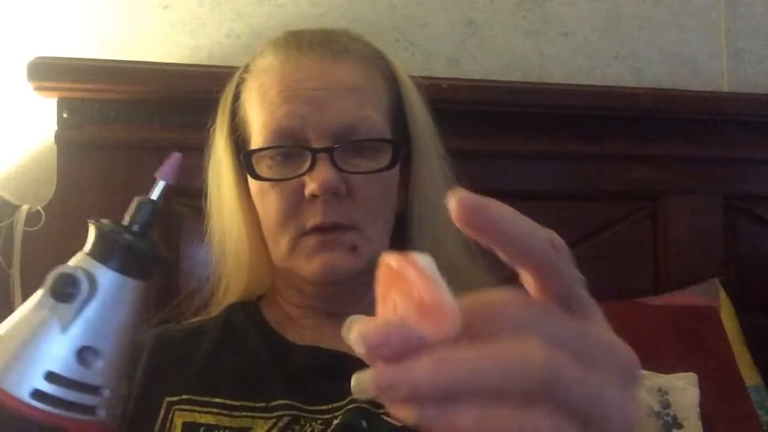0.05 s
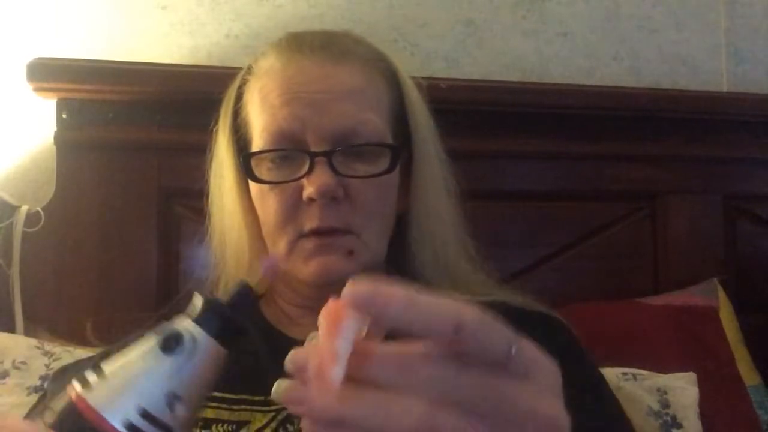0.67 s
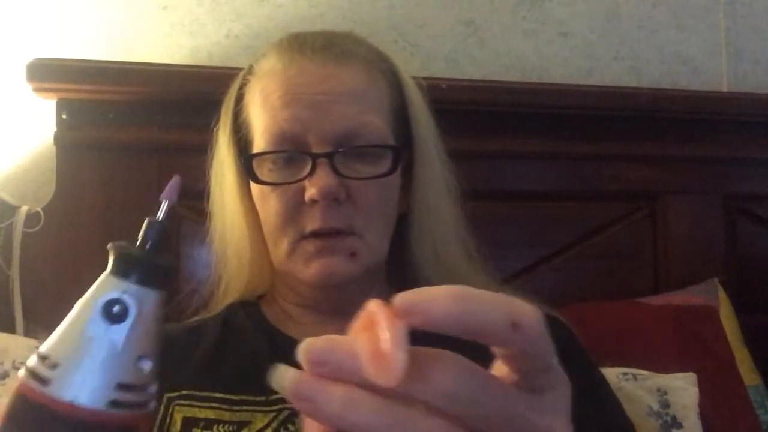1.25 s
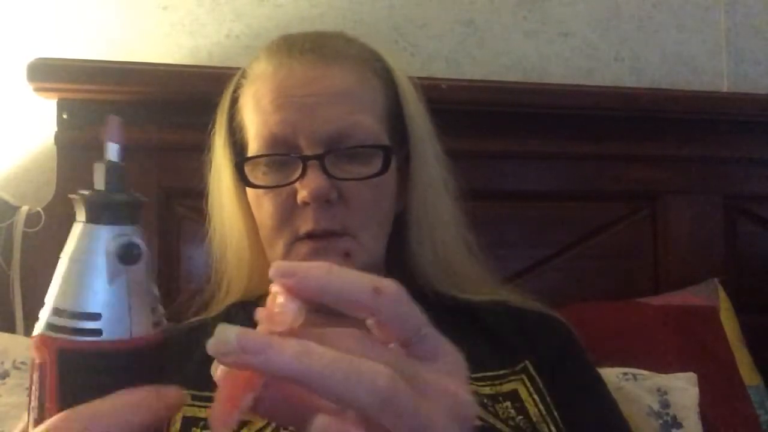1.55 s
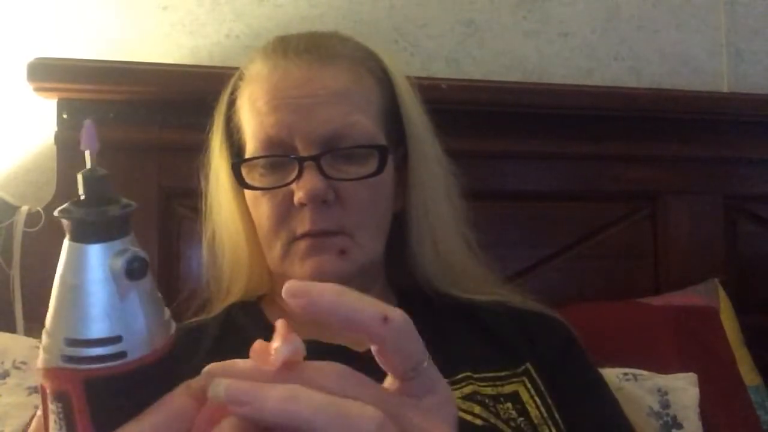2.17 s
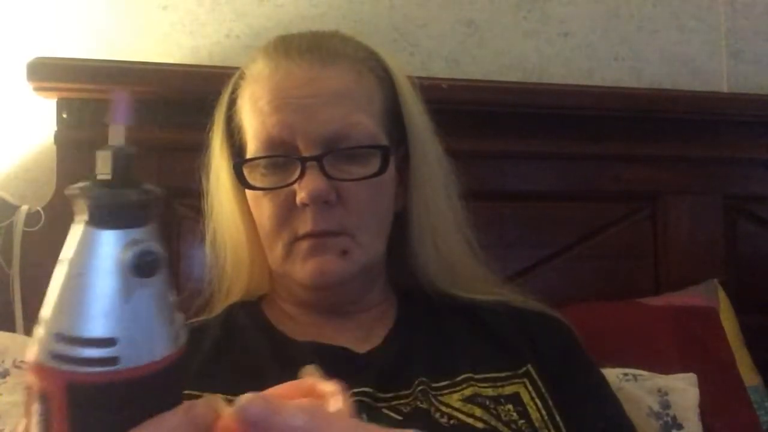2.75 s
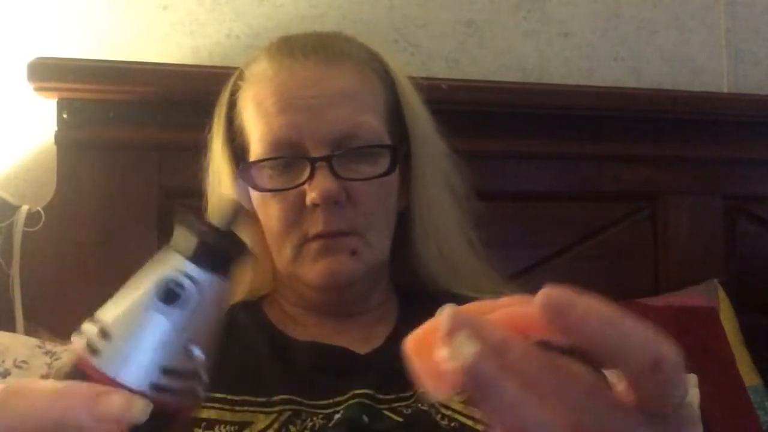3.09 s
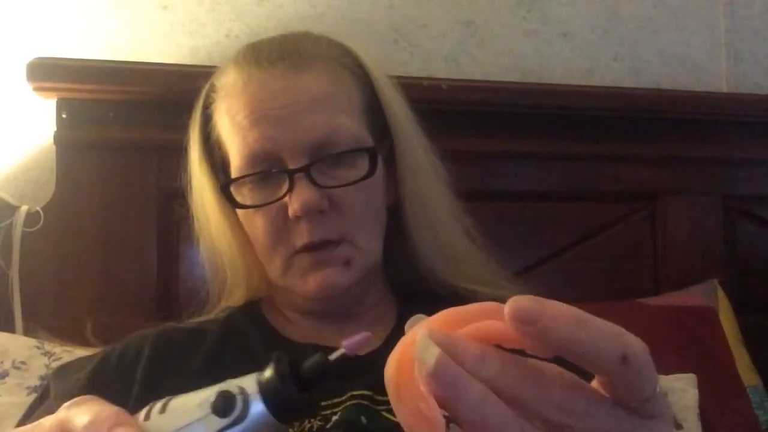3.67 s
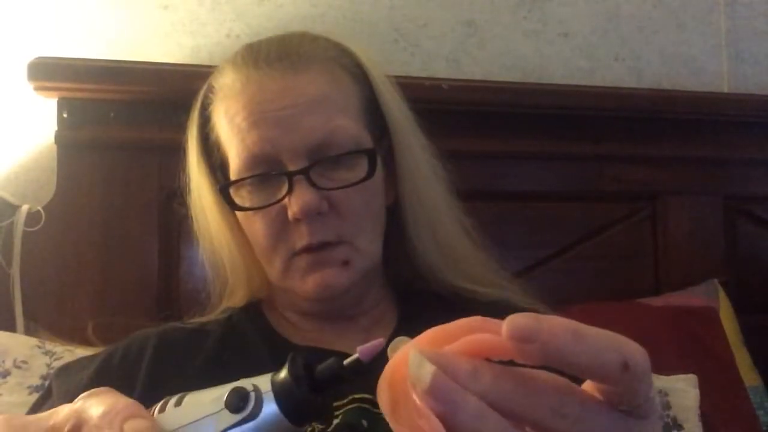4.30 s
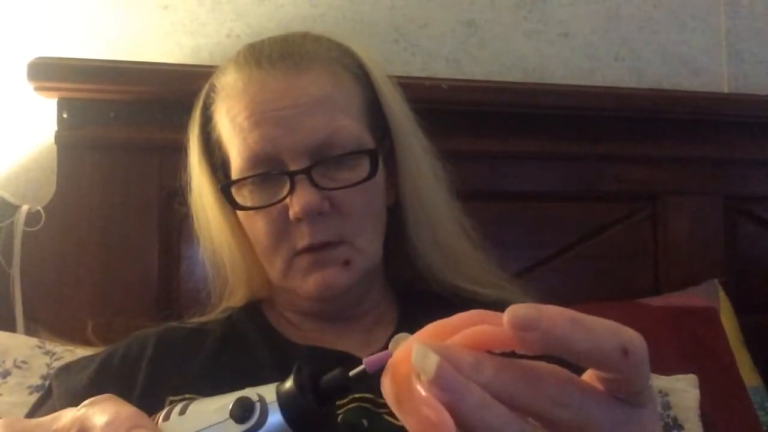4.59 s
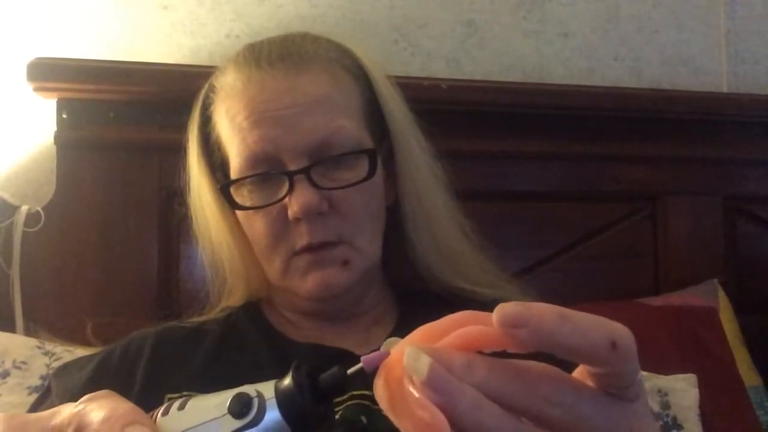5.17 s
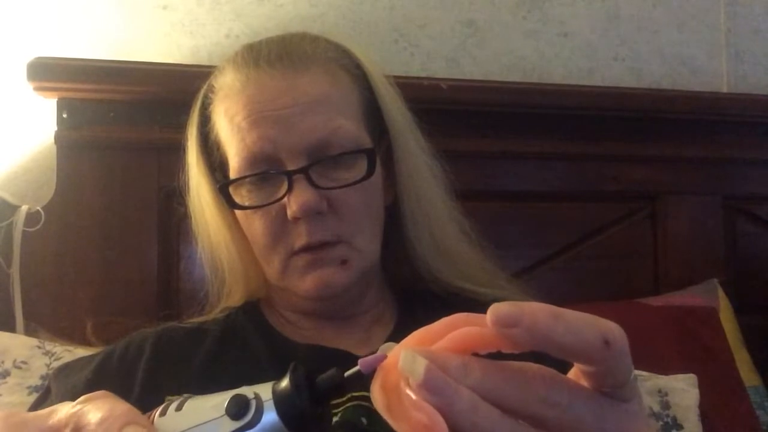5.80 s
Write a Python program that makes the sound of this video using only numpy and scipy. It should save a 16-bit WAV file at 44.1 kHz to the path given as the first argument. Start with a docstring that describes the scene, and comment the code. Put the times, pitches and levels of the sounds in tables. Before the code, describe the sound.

A handheld rotary tool is already running at low speed, close to the microphone in a bedroom, and keeps going for the whole six seconds or so. It makes a buzzing electric whine with a fine, fast rattle and a hiss of cooling air, its pitch creeping slowly upward. A thin, high squeal fades within the first second. The tone shifts as the tool is moved, noticeably around 1.4 seconds, when a faint, low puff of vent air brushes the microphone, and again at about 3.2 seconds as it is lowered. At about 4.5 and 4.8 seconds the grinding stone briefly touches a piece of plastic with short, gritty rasps. From 5 seconds to the end it bites again and again in quick, uneven scrapes with a fizzy, chipping edge, louder and rougher, over the continuing motor whine.

```python
"""A bedroom, close up and in mono: a handheld rotary tool runs at low speed, slowly winding up.
Its shaft rattles once a turn, chopped mains current makes the motor buzz, and the fan whines and hisses.
The colour shifts as the tool is tilted, held upright, then lowered to a plastic piece,
where the stone bites harder and harder, rasping, tearing off chips and dragging on the shaft."""
import sys
import numpy as np
from scipy import signal
from scipy.fft import rfft, irfft
from scipy.io import wavfile

SR = 44100
rng = np.random.default_rng(int(sys.argv[2]) if len(sys.argv) > 2 else 0)


def file_out(sig):
    """Save sig as 16-bit WAV at sys.argv[1]."""
    # one column per channel
    cols = np.atleast_2d(sig).T
    # limit, then scale
    lim = np.clip(cols, -1, 1)
    pcm = np.round(lim * 32767).astype(np.int16)
    wavfile.write(sys.argv[1], SR, pcm)


N = 257582
TIME = np.arange(N) / SR
BINS = np.fft.rfftfreq(N, 1 / SR)

# how the tool is held: t/s, pose (up to 0 raised, 1 tilted, 2 upright, from 3 lowered)
POSE_PATH = [(0, -1), (.25, 0.3), (.55, 1), (1.25, 0.45), (1.45, 2), (1.65, 2), (2.95, 2), (3.25, 2.5),
             (5.84, 3.5)]
# rattle partials for each grip: order (multiple of the shaft speed), level/dB
RATTLE_OPEN = [(13, -65), (14, -50.5), (15, -59), (17, -50), (18, -43.5), (19, -57), (20, -58), (21, -38.5),
               (22, -42), (23, -33.5), (24, -35), (25, -38), (26, -35), (27, -56), (28, -69), (29, -64),
               (30, -42), (31, -50), (33, -53), (34, -52)]
RATTLE_SHADED = [(13, -74), (14, -44.5), (15, -54), (17, -46), (18, -54), (19, -58), (20, -57), (21, -46.5),
                 (22, -56), (23, -44.5), (24, -48), (25, -42.5), (26, -53), (27, -46), (28, -66), (29, -68),
                 (30, -51.5), (31, -55), (33, -50), (34, -55)]
RATTLE_LOWERED = [(13, -60), (14, -57), (15, -44.5), (17, -66), (18, -56), (19, -54), (20, -51),
                  (21, -42.5), (22, -39), (23, -34.5), (24, -42), (25, -46), (26, -44.5), (27, -47.5),
                  (28, -54), (29, -46), (30, -42), (31, -43.5), (33, -44), (34, -48.5)]
# reflections lift or cancel single partials: t/s, half length/s, order, gain/dB
FLARES = [(.1, 0.13, 24, -7), (.05, .2, 26, -2), (0.427, 0.11, 23, 1.5), (1.25, 0.11, 8, 5.5),
          (1.85, .25, 8, -3.5), (1.383, 0.085, 14, 7), (1.5, 0.1, 16, 11), (1.507, 0.1, 23, 6.5),
          (1.523, 0.14, 8, -7.5), (1.9, 0.15, 16, -7), (2.423, 0.12, 2, 8.5), (3.15, 0.44, 8, -5),
          (2.55, 0.14, 14, -3), (2.6, 0.13, 18, 11), (2.915, 0.13, 11, 23.5), (3.15, 0.28, 18, 16.5),
          (3.297, 0.22, 16, 3)]
# the motor's lowest tones: order, level/dB
HUM = [(1, -58), (2, -59.5), (6, -52), (7, -52.5), (9, -63.5), (10, -60), (11, -68)]
# slot and commutator sidebands, rising a chop rate a row: tilted level/dB, upright/dB, lowered/dB
SLOT_SIDEBANDS = [(-60, -52.5, -54), (-47, -41, -46), (-56, -58, -50.5), (-61, -53, -60), (-74, -63, -53.5),
                  (-62, -57, -54), (-81, -58, -51.5), (-58, -53.5, -50.5)]
BAR_SIDEBANDS = [(-58.5, -61, -61), (-53.5, -54, -66), (-47.5, -45, -48.5), (-44, -42, -42),
                 (-39, -48.5, -44.5), (-43, -62, -60), (-52, -59, -59), (-50, -61, -66), (-51, -63, -58)]
# fader ride on the commutator buzz: t/s, gain/dB
BUZZ_RIDE = [(0.05, -8), (0.45, 0.5), (.8, 0), (1.15, 1), (1.5, 1), (1.75, -1.5), (2.3, -3), (2.7, 1),
             (3.15, 5), (3.7, -0.5), (4.95, -2)]
# passing motor whistles: start/s, end/s, order, level/dB
WHISTLES = [(-0.6, .56, 11.36, -44.5), (-0.6, 0.582, 11.41, -48.5), (.56, .9, 11.36, -55),
            (.58, 0.905, 11.41, -50), (2, 3.4, 10.8, -56), (2.504, 4.403, 1.765, -55),
            (4.3, 6, 1.61, -58.5)]
# the stone bears on the plastic: start/s, end/s, rasp drive/dB, growl level/dB
BITES = [(4.539, 4.548, -26, -35), (4.57, 4.598, -32, -44), (4.789, 4.833, -33, -39.5),
         (4.992, 5.035, -32, -37), (5.048, 5.069, -29, -39), (5.115, 5.172, -33, -39),
         (5.187, 5.232, -31, -39), (5.255, 5.301, -28.5, -35), (5.326, 5.362, -28.5, -35.5),
         (5.364, 5.4, -35, -44), (5.424, 5.47, -30.5, -49), (5.476, 5.52, -30.5, -35),
         (5.531, 5.574, -29.5, -35.5), (5.59, 5.629, -27, -38.5), (5.636, 5.668, -34, -38),
         (5.74, 5.755, -28.5, -50), (5.78, 5.814, -25.5, -36.5), (5.816, 5.852, -27.5, -37)]
# the grit tears off chips: start/s, end/s, level/dB
CHIPS = [(4.537, 4.557, -35), (4.557, 4.595, -36.5), (4.79, 4.86, -45), (5.116, 5.14, -41),
         (5.195, 5.245, -38), (5.26, 5.31, -38), (5.326, 5.345, -34), (5.35, 5.365, -43),
         (5.445, 5.47, -39), (5.49, 5.538, -41), (5.55, 5.59, -35), (5.595, 5.62, -44), (5.63, 5.648, -38),
         (5.728, 5.746, -35), (5.763, 5.808, -40)]
# resonances of the shell, the stone on its shank and the plastic: f/Hz, width/Hz, gain/dB
SHELL_MODES = [(767.5, 18, 8.5), (1343, 157, 5), (2312, 440, -1), (2809, 510, 2.5)]
STONE_MODES = [(4258, 130, -8), (4760, 460, -5), (5386, 270, 4), (5820, 270, 4.5), (6504, 276, 8),
               (7640, 790, -10), (9300, 760, -16), (11000, 1200, -14), (12800, 1200, -29)]
PLASTIC_MODES = [(534, 170, -9.5), (1583, 200, 3.5), (1850, 320, 3.5), (2159, 325, 5.5), (2400, 84, -3),
                 (3316, 300, 1.5)]
# fan partials for each grip: order, level/dB
WHINE_RAISED = [(35, -64), (37, -52), (38, -58), (40, -43), (42, -44.5), (44, -55), (46, -48), (47, -51),
                (50, -52), (52, -61), (54, -57), (57, -61), (60, -70), (63, -57)]
WHINE_TILTED = [(35, -57), (37, -52.5), (38, -60), (39, -54), (41, -56), (42, -58), (44, -60), (45, -56),
                (46, -56), (47, -63), (48, -54), (49, -58), (50, -58), (51, -66), (53, -56), (54, -59),
                (56, -59), (59, -61), (63, -64)]
WHINE_SHADED = [(35, -55), (36, -65), (37, -54), (38, -60), (40, -57), (41, -68), (43, -60.5), (45, -54),
                (46, -58), (47, -55), (48, -52), (49, -63), (50, -58), (51, -67), (53, -62), (58, -63),
                (63, -66)]
WHINE_LOWERED = [(35, -66), (36, -59), (37, -47.5), (38, -63), (39, -52), (41, -57), (42, -63), (44, -53),
                 (45, -65), (46, -50.5), (48, -49), (50, -58), (51, -68), (53, -68), (55, -54.5), (58, -59),
                 (60, -66), (63, -70)]
# noise colours of tearing chips, cooling air and the vent jet: f/Hz, relative level/dB
FIZZ_EQ = [(3000, -25), (6000, 2.5), (8500, -8), (9600, -6), (10400, -3), (11400, -1), (12200, -13),
           (13200, -12), (14500, -20), (16000, -26)]
AIR_EQ = [(15, -57), (50, -27), (120, -18), (230, -15), (360, -9.5), (650, -6), (820, -1.5), (1050, -8),
          (1400, 1), (1750, -4), (2700, -5.5), (3400, -7), (5000, -2.5), (6300, -7.5), (7300, -8),
          (9500, -13.5), (11500, -15), (13000, -16), (16000, -26)]
JET_EQ = [(2000, -45), (3700, -36), (4500, -6.5), (5700, -6.5), (6600, -3.5), (7150, 0), (7900, -2.5),
          (8400, -21), (16000, -62)]
# the draught's rumble: f/Hz, relative level/dB
DRAUGHT_EQ = [(10, -37), (28, -19), (50, -3), (85, 1), (160, -7), (260, -18), (700, -55)]
# the draught brushes the microphone: t/s, half length/s, level/dB
PUFFS = [(1.34, 0.035, -56), (1.427, .02, -54), (1.49, 0.028, -42.5), (1.58, 0.043, -49.5),
         (1.71, 0.045, -61)]
# how strongly each part faces the microphone: raised/dB, tilted/dB, upright/dB, lowered/dB
RATTLE_DB = (-3.5, -1.5, -1.5, 0)
THIRD_DB, BAR_OCTAVE_DB = (-46, -51, -60.5, -50.5), (-49, -35.5, -47.5, -49.5)
JET_DB, JET_TOP_DB = (-6.5, -2.5, -7, -1.5), (3.5, 1, -3, -5)

CHOP_HZ = 120  # slices of mains current a second
BEARING_ORDER, SLOTS, BARS = 2.573, 8, 16  # cycles a turn: bearing, armature, commutator
GRIP_S, GRIP_FADE_S, RELEASE_S, RELEASE_FADE_S = 1.387, 0.039, 3.08, 0.23


def rattle(turns):
    """The shaft knocks once a turn, a little loose in timing and force."""
    shaded, lowered = shade(), window(RELEASE_S, np.inf, RELEASE_FADE_S)
    grips = [(RATTLE_OPEN, 1 - shaded - lowered), (RATTLE_SHADED, shaded), (RATTLE_LOWERED, lowered)]
    knocks = partials(grips, turns + .0012 * drift(hz=110), waver_db=1.4, scatter=.06, smear=.014)
    return knocks * amp(posed(RATTLE_DB) + 0.75 * drift(hz=123.1))


def motor(turns):
    """Hum and magnetic tones throb with the chopped current; a bearing tone grows as the tool runs."""
    current = unit(surge(TIME * CHOP_HZ, start=0.041, rise=0.19, fall=0.27))
    hum = sum(amp(db + flare(round(k)) + 2 * drift(hz=5) + 2.5 * drift(hz=18))
              * tone(turns, round(k), rng.random()) for k, db in HUM)
    hum *= 0.82 + 0.17 * current
    bearing_db = -42 - 20 * np.exp(-TIME / 3)
    bearing = amp(bearing_db + 1.2 * drift(hz=20)) * tone(turns, BEARING_ORDER, 0.066 * drift(hz=8.4))
    third_db = posed(THIRD_DB) + 7 * load()  # load brings out the third order
    third = amp(third_db + 2 * drift(hz=14)) * tone(turns, 3) * (.65 + .45 * current)
    slots = amp(2 * load() * drift(hz=14))
    slots *= chopped(turns, SLOTS, SLOT_SIDEBANDS, first_step=-1, peak=.19, waver_db=1.2, scatter=.0083)
    fourth = amp(-59.5 + 5.1 * drift(hz=9)) * tone(turns, 4)
    sideband = amp(bearing_db - 5 - 4.3 * load() + 2 * drift(hz=12))
    sideband *= tone(turns, 3, TIME * CHOP_HZ + 0.14 * drift(hz=13))
    return hum + bearing + third + slots + fourth + sideband


def commutator(turns):
    """The bars buzz on the chopped current, with a thin tone an octave up that the hand shades."""
    buzz = chopped(turns, BARS, BAR_SIDEBANDS, first_step=-4, peak=.3, waver_db=1.46, scatter=0.022)
    octave_db = posed(BAR_OCTAVE_DB) - 3 * shade() + 1.3 * drift(hz=8)
    octave = amp(octave_db) * tone(turns, 2 * BARS, 0.12 * drift(hz=60.7))
    return amp(ride(BUZZ_RIDE) - 0.5 * load()) * buzz + octave


def grinding(turns):
    """The stone's high spot strikes the plastic once a turn, drags its grit and tears off fine chips."""
    rasp_power = sum(amp(2 * db) * window(start, end, fade=0.0085) for start, end, db, _ in BITES)
    growl_power = sum(amp(2 * db) * window(start, end, fade=0.014) for start, end, _, db in BITES)
    # under load the stone keeps skimming between bites
    rasp = np.sqrt(rasp_power + (amp(-40) * load()) ** 2)
    growl = np.sqrt(growl_power + (amp(-46) * load()) ** 2)
    tearing = sum(amp(db) * window(start, end, fade=.005) for start, end, db in CHIPS)
    contact = turns + .17 + .004 * drift(hz=22) + .001 * drift(hz=110)
    strikes = unit(np.diff(np.floor(contact), prepend=0.))
    strikes *= amp(.8 * drift(hz=60) + 1.1 * drift(hz=25))
    grit = unit((.12 + surge(contact, start=0.013, rise=0.057, fall=0.7)) * rng.standard_normal(N))
    stone = unit(ring(strikes + .22 * grit, STONE_MODES, order=2))
    plastic = unit(ring(strikes + .16 * grit, PLASTIC_MODES, order=2))
    fizz = unit(noise(FIZZ_EQ) * surge(contact, start=.02, rise=.04, fall=0.33))
    return amp(1.2) * rasp * stone + growl * plastic + tearing * fizz


def fan(turns):
    """A whine of high shaft partials over a bed of air, and a vent jet that flutters with each turn."""
    raised = posed([1, 0, 0, 0])
    gripped, lowered = window(GRIP_S, np.inf, fade=.15), window(3.14, np.inf, fade=0.93)
    grips = [(WHINE_RAISED, raised), (WHINE_TILTED, 1 - raised - gripped),
             (WHINE_SHADED, gripped - lowered), (WHINE_LOWERED, lowered)]
    whine = partials(grips, turns + .0003 * drift(hz=90), waver_db=2, scatter=.2, smear=.012)
    air = amp(-40 + 0.65 * drift(hz=11)) * noise(AIR_EQ)
    sweep_db = 1.5 * swell(3.3, half=0.16)  # the vents swing past the microphone
    jet = noise(JET_EQ)
    top = irfft(rfft(jet) * (BINS > 7000), N)  # the top end beams straight out of the vents
    jet = jet - top + amp(posed(JET_TOP_DB) + sweep_db - 2 * shade()) * top
    flutter = unit(0.092 + surge(turns, start=0.94, rise=0.49, fall=1.0))
    jet *= amp(posed(JET_DB) + sweep_db - 36) * flutter
    return amp(-0.73 + 1.08 * drift(hz=19)) * whine + air + jet


def sparks(turns):
    """Each switch-on of the current jolts the armature tone into the shell, and the brushes crackle."""
    slices = TIME * CHOP_HZ
    jolts = surge(slices, start=0.039, rise=0.0084, fall=0.033) * tone(turns, SLOTS)
    jolts *= 1 + 0.28 * drift(hz=60.35)
    crackle = surge(slices, start=0.01, rise=0.016, fall=0.25) * rng.standard_normal(N)
    ticks = amp(-49.5) * unit(ring(jolts, SHELL_MODES, order=2))
    return ticks + amp(-51) * unit(ring(crackle, SHELL_MODES))


def passing_whistles(turns):
    """Thin motor whistles fade in and out, tracking the shaft speed."""
    return sum(amp(db + 2.2 * drift(hz=22)) * window(start, end, fade=.25)
               * tone(turns, order, .07 * drift(hz=16)) for start, end, order, db in WHISTLES)


def shaft_squeal():
    """A fuzzy, fluttering high whistle from the shaft that soon dies away."""
    whistle = unit(ring(rng.standard_normal(N), [(6610, 210, 0)], order=2))
    return amp(-39.5 + 3.3 * drift(hz=8.1)) * window(-1, 0.44, fade=0.59) * whistle


def draught():
    """Soft low buffets as the vents swing past the microphone."""
    return sum(amp(db) * swell(s, half) for s, half, db in PUFFS) * noise(DRAUGHT_EQ)


def shaft_speed():
    """Turns a second: a run-up that eases off, less the drag of the work."""
    start_hz, rise_hz_per_s, ease_hz_per_s2, sag_hz_per_s = 245.345, 4.4665, .0982, 1.95
    free_hz = start_hz + rise_hz_per_s * TIME - ease_hz_per_s2 * TIME ** 2
    return free_hz - sag_hz_per_s * np.cumsum(load()) / SR


def load():
    """0 while the tool runs free, 1 once the stone stays on the work."""
    return window(4.98, np.inf, fade=0.14)


def shade():
    """0 in the open, 1 with the hand round the shell; the grip closes fast and opens more slowly."""
    closing = 1 - np.exp(-np.maximum(TIME - GRIP_S, 0) / GRIP_FADE_S)
    return closing - window(RELEASE_S, np.inf, RELEASE_FADE_S)


def posed(values):
    """Morphs between one value per pose as the tool is turned."""
    return np.interp(ride(POSE_PATH), np.arange(len(values)), values)


def flare(order):
    """The boost or cut in dB that passing reflections give one shaft order."""
    return sum(db * swell(s, half) for s, half, k, db in FLARES if round(k) == order)


def partials(grips, turns, waver_db, scatter, smear):
    """Shaft partials blended from a (spectrum, share) per grip; reflections stir level and phase."""
    first = grips[0][0]
    orders = np.arange(round(first[0][0]), round(first[-1][0]) + 1)
    out = np.zeros(N)
    for k in np.setdiff1d(orders, [BARS, 2 * BARS]):  # these two belong to the commutator
        level_db = sum(share * np.interp(k, *np.transpose(points)) for points, share in grips)
        level_db += flare(k) + waver_db * drift(hz=2.5)
        lag = smear * (k - orders.mean()) ** 2  # the shell delays each partial, smearing the pulse
        out += amp(level_db) * tone(turns, k, scatter * drift(hz=0.65) - lag)
    return out


def chopped(turns, order, sidebands, first_step, peak, waver_db, scatter):
    """A shaft order whose sidebands throb once per slice of current, at the share `peak` of the slice."""
    slices, out = TIME * CHOP_HZ - peak, np.zeros(N)
    jitter = scatter * drift(hz=30.54)
    for step, (tilted_db, upright_db, lowered_db) in enumerate(sidebands, first_step):
        level_db = posed([tilted_db, tilted_db, upright_db, lowered_db])
        level_db += waver_db * drift(hz=2.5) + (step == 0) * flare(order)
        out += amp(level_db) * tone(turns, order, step * slices + jitter + 0.082 * drift(hz=1.53))
    return out


def tone(turns, order, phase=0):
    """A pure tone locked to the shaft; phase is in cycles."""
    return np.cos(2 * np.pi * (order * turns + phase))


def noise(eq):
    """Noise of rms 1, coloured by an EQ curve."""
    hz, db = np.transpose(eq)
    gain = amp(np.interp(np.log(BINS + 1), np.log(hz), db))
    return unit(irfft(rfft(rng.standard_normal(N)) * gain, N))


def ring(x, modes, order=1):
    """A resonator bank; a higher order gives steeper skirts and a softer attack."""
    body = sum(amp(db) * (1j * BINS * width / (hz ** 2 - BINS ** 2 + 1j * BINS * width)) ** order
               for hz, width, db in modes)
    return irfft(rfft(x) * body, N)


def surge(cycles, start, rise, fall):
    """A quick attack and slower decay in every cycle; times are shares of a cycle."""
    age = (cycles - start) % 1
    return (1 - np.exp(-age / rise)) * np.exp(-age / fall)


def window(start, end, fade):
    """A soft-edged gate, open from start to end."""
    return np.clip(.5 + np.minimum(TIME - start, end - TIME) / fade, 0, 1)


def swell(s, half):
    """A smooth bump of height 1 around the time s."""
    return np.exp(-((TIME - s) / half) ** 2)


def ride(points):
    """Straight ramps through (time, value) points."""
    return np.interp(TIME, *np.transpose(points))


def drift(hz):
    """A random wobble of rms 1."""
    knots = rng.standard_normal(6000)
    return unit(np.interp(TIME * hz * 2, np.arange(len(knots)), knots))


def amp(db):
    return 10 ** (np.asarray(db) / 20)


def unit(x):
    return x / np.sqrt(np.mean(abs(x) ** 2) + 1e-20)


def scene():
    """All layers of the tool, mixed dead centre."""
    turns = np.cumsum(shaft_speed()) / SR
    mono = motor(turns) + commutator(turns) + passing_whistles(turns) + sparks(turns)
    mono += rattle(turns) + fan(turns) + shaft_squeal() + grinding(turns) + draught()
    return np.array([mono, mono])


def record(dry):
    """A steep high cut at 15.9 kHz."""
    low_pass = signal.firwin(511, 15900, window=("kaiser", 9), fs=SR)
    return signal.oaconvolve(dry, low_pass[None], "same")


dry = scene()
out = record(dry)
file_out(out)
```